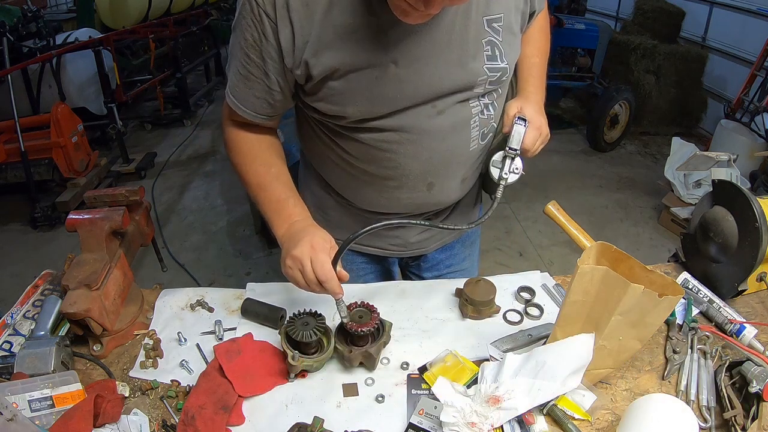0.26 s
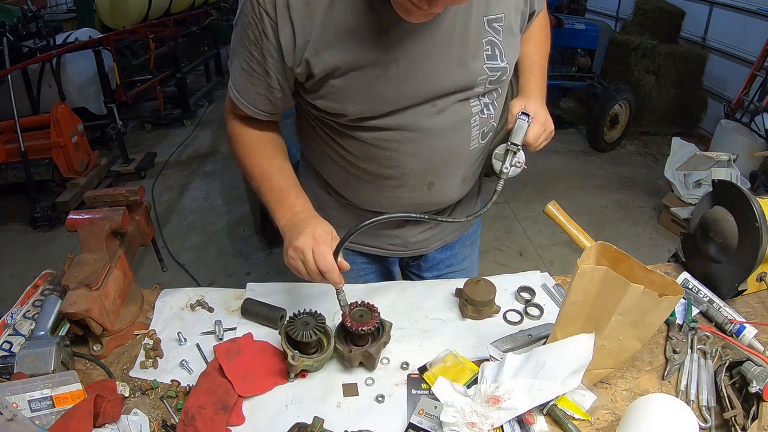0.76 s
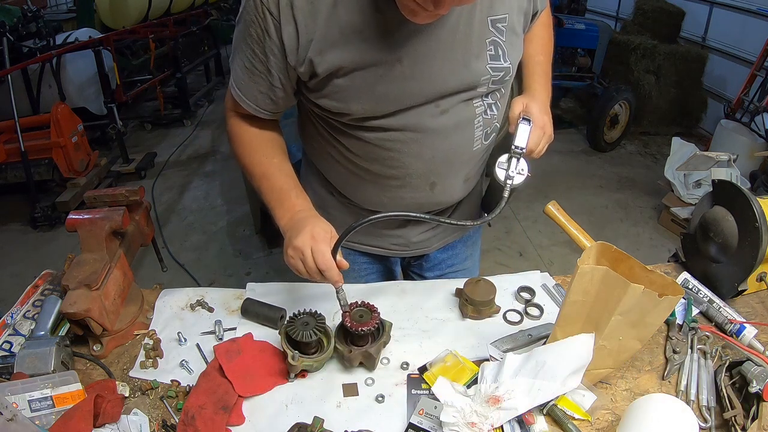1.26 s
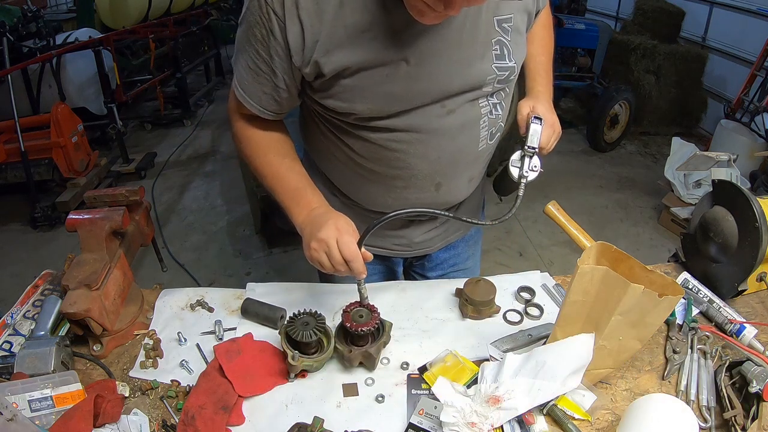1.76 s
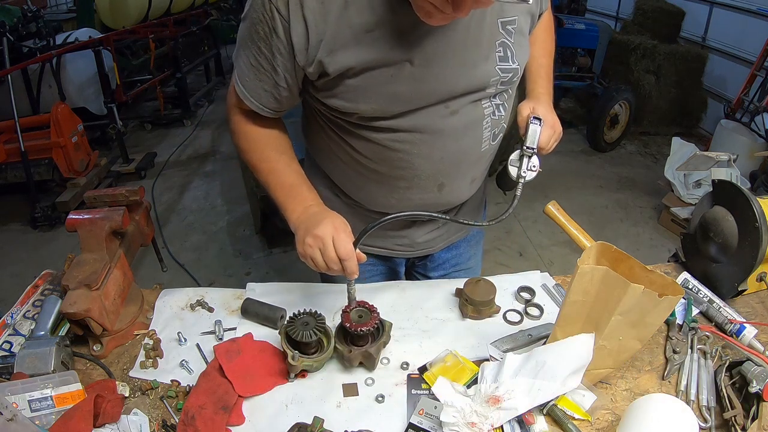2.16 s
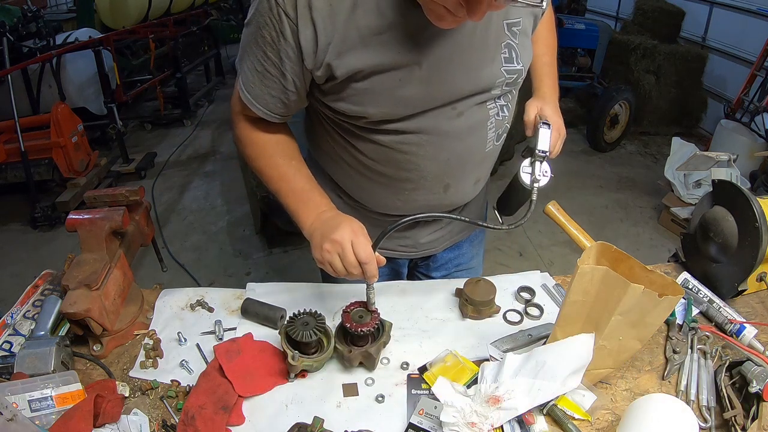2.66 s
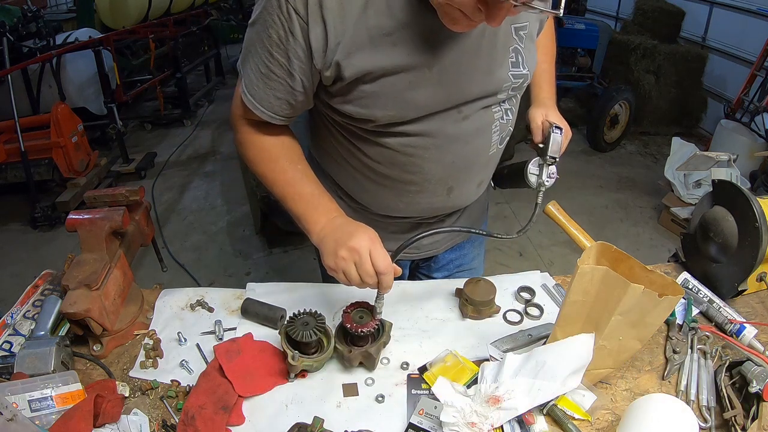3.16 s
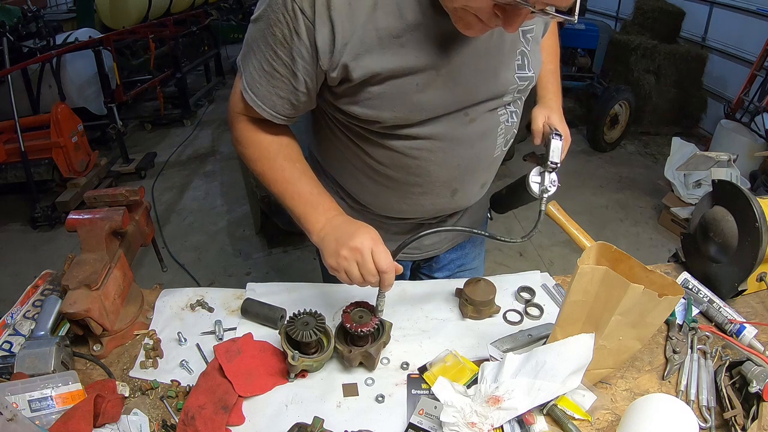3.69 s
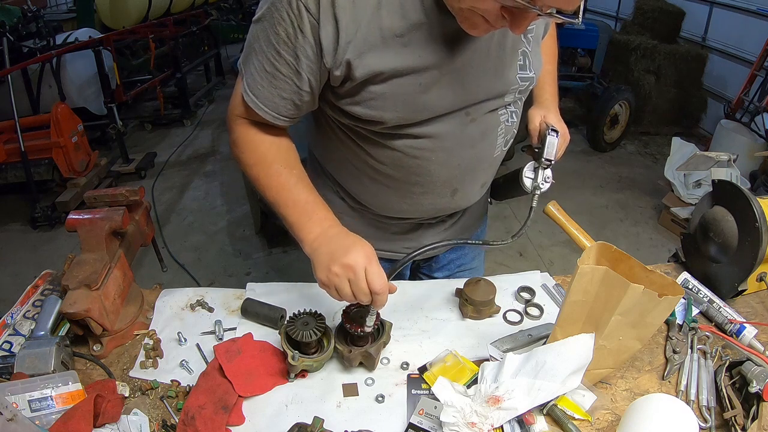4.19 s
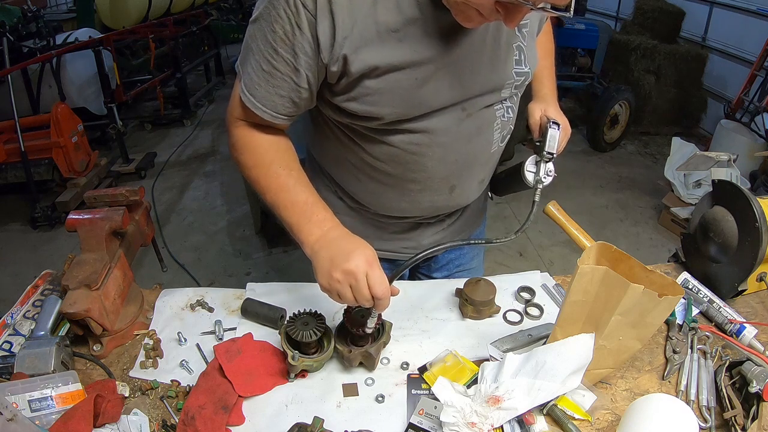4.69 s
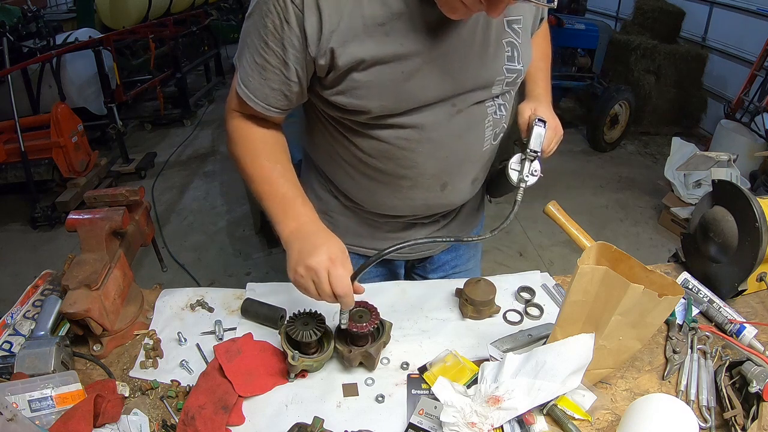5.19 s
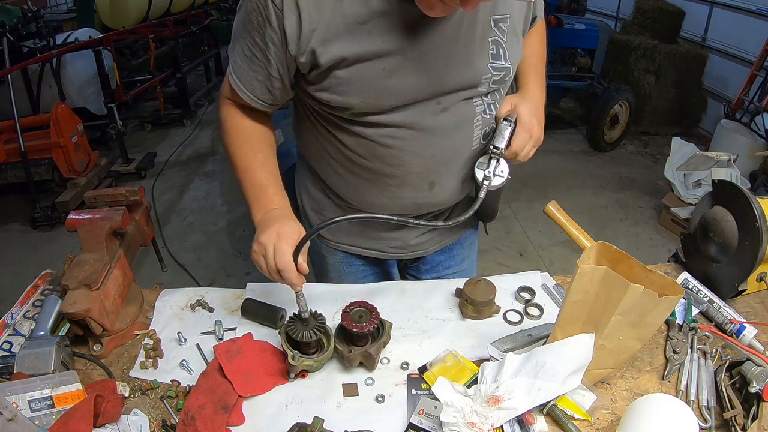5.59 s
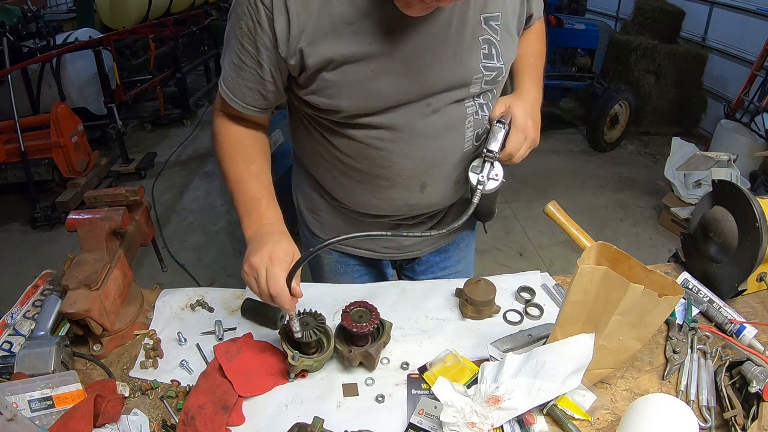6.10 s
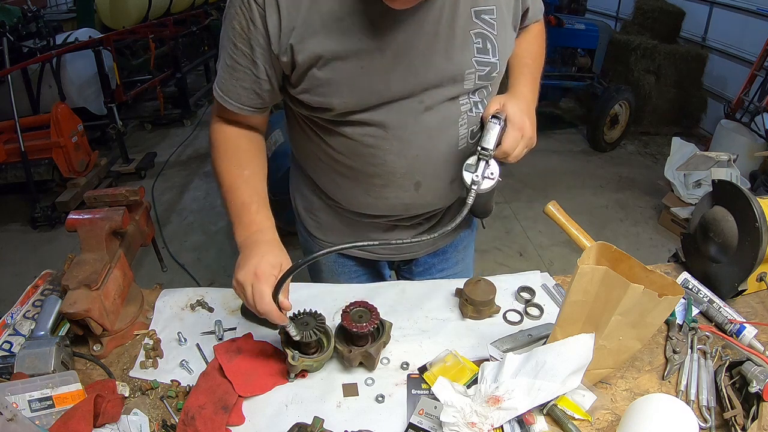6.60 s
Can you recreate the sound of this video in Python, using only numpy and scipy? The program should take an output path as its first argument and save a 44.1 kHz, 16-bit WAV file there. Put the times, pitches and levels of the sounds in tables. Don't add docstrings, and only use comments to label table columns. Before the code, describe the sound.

Scratchy, ringing, high-pitched rubbing and ticking from a pumped grease gun in a shed, over soft room noise and a growing deep vehicle rumble.

```python
import sys
import numpy as np
from scipy import signal
from scipy.fft import rfft, irfft, next_fast_len
from scipy.io import wavfile
from scipy.ndimage import uniform_filter1d, map_coordinates

SR = 44100
rng = np.random.default_rng(int(sys.argv[2]) if len(sys.argv) > 2 else 0)


def digitize_waveform(pressure):
    field = np.atleast_2d(pressure).T
    bounded = np.clip(field, -1, 1)
    quanta = np.round(bounded * 32767).astype(np.int16)
    wavfile.write(sys.argv[1], SR, quanta)


def volts_from_decibels(level):
    exponent = np.asarray(level, float) / 20
    return 10 ** exponent


N = 302085
TIME = np.arange(N) / SR


def unit(x):
    return x / np.sqrt(np.mean(np.abs(x) ** 2) + 1e-20)


def along(points, hz):
    f, v = np.transpose(points)
    return np.interp(np.log(hz + 1), np.log(f + 1), v)


def curves(tables):
    s, *cols = np.transpose(np.vstack(tables))
    sounding = sum((TIME >= rows[0][0]) & (TIME <= rows[-1][0]) for rows in tables) > 0
    return uniform_filter1d(1. * sounding, size=150), [np.interp(TIME, s, c) for c in cols]


def wobble(rate):
    return map_coordinates(rng.standard_normal(int(N * rate / SR) + 4), [TIME * rate])


def filtered(x, response):
    m = next_fast_len(N + SR // 2)
    return irfft(rfft(x, m) * response(np.fft.rfftfreq(m, 1 / SR)), m)[..., :N]


def noise(spectrum):
    return unit(filtered(rng.standard_normal(N), lambda hz: volts_from_decibels(along(spectrum, hz))))


def patchy(x, depth_db):
    z = signal.stft(x, nperseg=256)[2]
    field = uniform_filter1d(rng.standard_normal(z.shape[1:]), size=3, axis=0)
    field = unit(uniform_filter1d(field, size=16, axis=1))
    return unit(signal.istft(z * volts_from_decibels(depth_db * field), nperseg=256)[1][:, :N])


def ring(x, modes, shift_db):
    total = 0
    for hz, width_hz, db in modes:
        keep = np.exp(-np.pi * width_hz / SR)
        gain = np.sqrt(1 - keep ** 2)
        drive = volts_from_decibels(db + shift_db * np.tanh(wobble(16))) * x
        poles = [1, -2 * keep * np.cos(2 * np.pi * hz / SR), keep ** 2]
        total = total + signal.lfilter([gain, 0, -gain], poles, drive)
    return total


def glide(force, hz, width_hz, blow=0):
    keep = np.exp(-np.pi * width_hz / SR)
    grit = force * (rng.standard_normal(N) + 1j * rng.standard_normal(N))
    sway = signal.lfilter([1], [1, -keep], np.sqrt(1 - keep ** 2) * grit + blow)
    return np.real(sway * np.exp(2j * np.pi * np.cumsum(hz) / SR))


def kicks_at(s, db):
    kicks = np.zeros(N)
    kicks[np.round(s * SR).astype(int)] = volts_from_decibels(db)
    return kicks


def bursts(kicks, t60):
    return signal.lfilter([1], [1, -volts_from_decibels(-60 / (t60 * SR))], kicks, axis=-1)


def held(kicks):
    t, hold_s = np.arange(SR // 25) / SR, 0.004
    return signal.oaconvolve(kicks, volts_from_decibels(-60 * (t / 0.045 + (t / (hold_s * 5)) ** 2)))[:N]


# pitch_hz, level_db [dB per Hz]
ROOM_SHARED = [(150, -2.5), (250, -3.5), (350, -5), (500, -15), (750, -10), (1000, -15.5), (1500, -12.5),
               (2000, -11), (3000, -26.5), (15000, -90)]
# pitch_hz, level_db [dB per Hz]
ROOM_WIDE = [(100, -16), (250, 0.5), (350, -15), (500, -12.5), (1000, -15.5), (1500, -18), (2600, -25.5),
             (4200, -39), (7500, -43), (11000, -45), (15000, -64)]
# pitch_hz, level_db [dB per Hz]
FAR_HISS = [(1500, -15), (2500, 0), (5500, -4), (7500, -23), (9000, -32), (13200, -30), (14300, -56)]
# time_s, level_db
HISS_LEVEL = [
    (0, -69),
    (4.2, -71),
    (6.1, -68),
    (6.2, -75.5),
    (6.85, -72),
]


def room():
    nearing_db = 0.54 * (TIME - 4)
    hiss_db = curves([HISS_LEVEL])[1][0]
    mid = volts_from_decibels(-63.5 + nearing_db + 1.1 * wobble(3.3)) * noise(ROOM_SHARED) + volts_from_decibels(hiss_db) * noise(FAR_HISS)
    side = volts_from_decibels(-58 + 0.23 * nearing_db + 0.93 * wobble(2.4)) * noise(ROOM_WIDE)
    return np.array([mid + side, mid - side]) * volts_from_decibels([[-.8], [.8]])


def engine_order(level, hz):
    phase = 2 * np.pi * np.cumsum(hz) / SR + 0.51 * wobble(22)
    return level * volts_from_decibels(2.6 * wobble(16)) * np.sqrt(2) * np.sin(phase)


# peak_s, peak_db, length_s
DRONE_SWELLS = [(1.273, -75, 0.43), (1.718, -56, 0.22), (2.1, -61.5, 0.71), (2.45, -54, 0.44),
                (2.77, -53.5, 0.44), (3.13, -55, 0.33), (3.366, -45.5, .17), (3.531, -47, 0.2),
                (3.713, -41.5, 0.16), (3.93, -41.5, 0.26), (4.215, -39.5, 0.46), (4.504, -37, 0.64),
                (4.628, -35.5, 0.23), (5.006, -40.5, 0.45), (5.281, -31, 0.31), (5.134, -38, 0.29),
                (5.457, -33.5, 0.35), (5.75, -37, 0.094), (5.947, -32.5, 0.22), (6.101, -34.5, 0.28),
                (6.371, -35, 0.13), (6.658, -35.5, 0.27), (6.84, -46, 0.21)]


def drone():
    humps = []
    for s, db, length in DRONE_SWELLS:
        away = 2 * (TIME - s) / length * (1 + 0.16 * np.sign(TIME - s))
        humps.append(db - 29 * away ** 2)
    return engine_order(volts_from_decibels(np.max(humps, axis=0)), np.full(N, 73.3))


# time_s, pitch_hz, level_db
GROWLS = [
    [(5.55, 110, -58), (6.114, 108.8, -38), (6.22, 107.5, -60)],
    [(6.28, 120.2, -46.5), (6.436, 121.5, -43.5), (6.8, 114.7, -42)],
]


def growl():
    on, (hz, db) = curves(GROWLS)
    return engine_order(on * volts_from_decibels(db), hz)


# time_s, rumble_db
NEARNESS = [
    (0.0, -60.5),
    (0.57, -61),
    (3.81, -50.5),
    (4.55, -42.5),
    (4.83, -48),
    (5.25, -36),
    (6.24, -44.5),
    (6.85, -35),
]
# pitch_hz, level_db [dB per Hz]
RUMBLE_COLOUR = [(20, -86), (35, 0), (55, 10), (75, 16.5), (110, 13), (140, -1.5), (170, -72)]
# pitch_hz, level_db [dB per Hz]
ROAR_COLOUR = [(110, -3), (140, 6), (190, 6.5), (230, 0.5), (280, -21), (350, -39)]


def engine():
    tone = drone() + growl()
    rumble_db, = curves([NEARNESS])[1]
    roar_db = -59 + 0.19 * (rumble_db - rumble_db.mean())
    rumble = volts_from_decibels(rumble_db - 2.0 + 4.4 * np.tanh(wobble(9.6)) + 0.65 * wobble(3.96))
    roar = volts_from_decibels(roar_db + 2.65 * wobble(13) + 0.33 * wobble(2.95)) * noise(ROAR_COLOUR)
    mid = tone + rumble * noise(RUMBLE_COLOUR) + roar
    side = volts_from_decibels(-15.0) * np.roll(tone, 90)
    side = side + volts_from_decibels(-8.0) * rumble * noise(RUMBLE_COLOUR) + volts_from_decibels(roar_db - 4.0) * noise(ROAR_COLOUR)
    return np.array([mid + side, mid - side])


# start_s, pitch_hz, level_db
BUMPS = [
    (.74, 260, -53.5),
    (0.63, 230, -58),
    (3.08, 230, -55.5),
    (5.1, 283, -56.5),
    (1.386, 83, -43),
    (2.06, 270, -57.5),
    (3.02, 77, -42.5),
]


def bench():
    out = np.zeros(N)
    for s, hz, db in BUMPS:
        u = np.maximum(TIME - s, 0) / 0.0097
        out += volts_from_decibels(db + 12.0) * u * np.exp(-u) * np.sin(2 * np.pi * hz * (TIME - s))
    return out


# pitch_hz, t60_s
WALL_DECAY = [(1000, 0.14), (3000, 0.33), (6000, 0.34), (9000, 0.35)]


def shed(x):
    hz, t, z = signal.stft(rng.standard_normal((2, SR // 2)), SR, nperseg=256)
    tail = signal.istft(z * volts_from_decibels(-60 * t / along(WALL_DECAY, hz)[:, None]), SR, nperseg=256)[1]
    return signal.fftconvolve(x[None], tail / np.linalg.norm(tail[0]), axes=1)[:, :N]


def bench_top(x):
    t60 = 0.018
    tail = rng.standard_normal((2, 1500)) * volts_from_decibels(-60 * np.arange(1500) / SR / t60)
    return signal.oaconvolve(x[None], tail / np.linalg.norm(tail[0]), axes=1)[:, :N]


# start_s, peak_db
NOZZLE_TAPS = [
    (2.04, -33),
    (4.5006, -45),
    (4.659, -40.5),
    (6.3491, -41),
]


def taps():
    s, db = np.transpose(NOZZLE_TAPS)
    return glide(bursts(kicks_at(s, db - 7.0), t60=0.024), np.full(N, 2200.), width_hz=740)


# start_s, length_s, from_hz, to_hz, level_db
SEAL_SQUEAKS = [
    (3.356, 0.013, 7750, 7590, -35.5),
    (6.14, 0.052, 5450, 5250, -63),
    (6.173, 0.025, 5860, 5580, -58.5),
    (6.2, 0.029, 5100, 4532, -75),
]


def squeaks():
    out = np.zeros(N)
    for s, length, from_hz, to_hz, db in SEAL_SQUEAKS:
        u = np.clip((TIME - s) / length, 0, 1)
        phase = 2 * np.pi * np.cumsum(from_hz + (to_hz - from_hz) * u) / SR
        out += volts_from_decibels(db) * np.sin(np.pi * u) * np.sin(phase)
    return out


# start_s, length_s, from_hz, to_hz, level_db
SEAL_SQUEALS = [(.925, .11, 4800, 5120, -52), (.95, .07, 2080, 1900, -58), (.93, .08, 2640, 2600, -54),
                (2.47, .065, 4270, 4270, -60), (2.565, .125, 4270, 4260, -52),
                (2.575, .032, 1930, 1950, -57), (2.62, .07, 2580, 2550, -57), (3.6, .07, 5400, 5250, -47),
                (2.54, .05, 7500, 7550, -52), (4.3, .045, 5520, 5320, -51), (3.29, .05, 5950, 5600, -45),
                (3.4, .11, 4450, 4350, -51), (3.37, .07, 7150, 7000, -52), (3.37, .07, 5600, 5250, -47),
                (3.34, .05, 3450, 3200, -57), (3.42, .08, 3170, 3150, -59), (5.375, .056, 5000, 5350, -46),
                (5.49, .16, 4100, 4240, -57), (5.36, .07, 4300, 4250, -56), (6.56, .17, 5420, 5480, -46)]


def squeals():
    out, keep = np.zeros(N + SR), np.exp(-np.pi * 45 / SR)
    span = SR // 4
    for s, length, from_hz, to_hz, db in SEAL_SQUEALS:
        a, b = rng.standard_normal((2, span))
        u = np.clip(np.arange(span) / SR / length, 0, 1)
        sway = signal.lfilter([np.sqrt(1 - keep ** 2)], [1, -keep], a + 1j * b)
        sway = sway * np.sqrt(np.abs(np.sin(np.pi * u)))
        turn = np.exp(2j * np.pi * np.cumsum(from_hz + (to_hz - from_hz) * u) / SR)
        out[round(s * SR):][:span] += volts_from_decibels(db) * np.real(sway * turn)
    return out[:N]


# time_s, level_db, whistle_hz
CREEPING = [
    (5.66, -61, 5378),
    (5.664, -64, 5720),
    (6.22, -73.5, 5663),
]


def creep():
    on, (db, hz) = curves([CREEPING])
    return glide(on * volts_from_decibels(db), hz, width_hz=160)


# start_s, length_s, gap_s, peak_db, whistle_hz
SLIP_RUNS = [
    (6.281, .01, .02, -58, 5500),
    (6.335, .07, .059, -51.5, 5400),
]


def stutters():
    runs, k = [], np.arange(16)
    for s, length, gap, db, hz in SLIP_RUNS:
        late, louder, higher = rng.standard_normal((3, 16))
        starts = s + gap * (k + 0.0089 * (k > 0) * late)
        run = np.transpose([starts, db + 3 * louder, hz + 149 * higher])
        runs.append(run[k * gap < length])
    return np.vstack(runs)


# start_s, peak_db, whistle_hz
LONE_SLIPS = [(1.078, -39, 5593), (1.272, -31.5, 5615), (1.305, -28.5, 5640), (1.336, -32, 5640),
              (1.435, -31, 5458), (1.942, -25.5, 5620), (1.964, -37, 5610), (1.985, -27.5, 5460),
              (2.025, -34, 5640), (2.052, -28.5, 5530), (2.065, -37, 5930), (2.086, -35.5, 5638),
              (2.118, -29.5, 5480), (2.168, -33.5, 6310), (2.18, -28.5, 5530), (2.234, -34, 6210),
              (4.233, -39.5, 5800), (4.421, -38.5, 5644), (4.892, -30, 5600), (4.907, -35.5, 5600),
              (4.952, -34.5, 6070), (4.978, -30.5, 5600), (5.003, -38, 5660), (5.084, -36.5, 5610),
              (5.097, -28.5, 5680), (5.276, -50, 5460), (6.443, -53, 5410)]
# start_s, peak_db, whistle_hz
FALTERING = [(0.5091, -28.5, 5700), (0.5247, -29.5, 5770), (0.537, -32, 6290), (0.5548, -43, 5780),
             (0.5681, -28.5, 5840), (0.5853, -36, 5870), (0.605, -42, 5520), (0.6231, -35, 6380),
             (0.6302, -39, 5680), (0.6626, -29.5, 5680), (0.6742, -40, 5470), (0.6846, -31.5, 6280),
             (0.7055, -34.5, 6360), (0.7182, -41, 6350), (0.7355, -38, 5700), (0.7491, -42, 6330),
             (2.255, -29.5, 5670), (2.2655, -33, 5580), (2.2787, -50, 6290), (2.2927, -27, 5680),
             (2.329, -29, 5710), (2.3467, -35, 5700), (2.3609, -31.5, 5710), (3.9643, -29, 5930),
             (3.9778, -30, 6030), (4.0006, -30.5, 5780), (4.0138, -31, 5870), (4.0252, -33.5, 5880),
             (4.0346, -37, 5510), (4.0445, -39, 5920), (4.0872, -31, 5880), (4.0982, -30.5, 5880),
             (4.1146, -32, 5880), (4.1255, -31, 5420), (4.1479, -33.5, 5860),
             (4.3077, -32.5, 5840), (4.322, -33, 5870), (4.5202, -36.5, 5700), (4.5366, -39.5, 6050),
                   (4.603, -27.5, 5570), (4.6219, -29.5, 5660), (4.6304, -31, 5640), (4.733, -32, 5660),
                   (4.7423, -28.5, 5660), (4.76, -32, 5700), (4.7747, -43, 5670), (4.7829, -32.5, 5660),
                   (4.7938, -30.5, 5700), (4.8134, -30, 6050), (4.8339, -34.5, 5740), (4.8446, -44, 6270),
                   (6.4969, -44.5, 5480), (6.5115, -48, 5600), (6.5203, -34, 5480), (6.5338, -36, 5470),
                   (6.544, -36, 5490), (6.5537, -36, 5490)]


def slips():
    faltering = np.array(FALTERING) + [0, -3, 0]
    rows = np.vstack([LONE_SLIPS, stutters(), faltering])
    s, db, hz = rows[np.argsort(rows[:, 0])].T
    kicks = kicks_at(s, db - 7)
    force = 0.62 * held(kicks) + 0.1 * bursts(kicks, t60=0.16)
    latest = np.maximum(np.searchsorted(s, TIME + 1 / SR) - 1, 0)
    return kicks, force, hz[latest]


def slip_whistle(blow, slip, slip_hz):
    ping_s = 0.0034
    ping = signal.oaconvolve(blow, np.clip(1 - (TIME[:400] / ping_s) ** 2, 0, 1))[:N]
    return glide(0.88 * slip, slip_hz, width_hz=384, blow=volts_from_decibels(-26) * ping)


def stroke(tables, rate, scatter_db, t60, steady):
    on, (db, *colour) = curves(tables)
    turns = np.cumsum(rate * volts_from_decibels(0.37 * (db + 41.5) + 2.7 * wobble(70))) / SR
    kicks = np.diff(np.floor(turns), prepend=0) * volts_from_decibels(scatter_db * rng.standard_normal(N))
    rough = bursts(kicks, t60)
    force = steady + unit(rough / (1e-9 + uniform_filter1d(rough, size=4000)))
    return on * volts_from_decibels(db) * unit(force), *colour


# start_s, peak_db
CATCHES_EARLY = [
    [(0.0206, -41), (0.0346, -34.5), (0.05, -33), (0.0753, -24.5), (0.1506, -28.5), (0.1666, -39),
     (0.1832, -47), (0.1903, -40), (0.2272, -28), (0.245, -22), (0.2812, -30), (0.2918, -34), (0.2994, -28),
     (0.3208, -36), (0.3315, -35), (0.3407, -26), (0.3495, -43), (0.3601, -33), (0.3761, -24),
     (0.3862, -27), (0.3987, -26), (0.4211, -22), (0.4379, -31), (0.4535, -22), (0.4642, -31),
     (0.4734, -24), (0.4938, -34)],
    [(1.3496, -25), (1.3674, -31), (1.3747, -33), (1.3839, -31), (1.4181, -23), (1.4756, -43),
     (1.4852, -34), (1.4922, -28), (1.5082, -25), (1.5213, -35), (1.5362, -28), (1.5481, -27),
     (1.5747, -27), (1.5836, -28), (1.6026, -25), (1.6238, -34), (1.6341, -23), (1.6503, -33),
     (1.6621, -33), (1.694, -42), (1.7054, -25), (1.7165, -34), (1.7401, -27), (1.7689, -24), (1.7785, -34),
     (1.8156, -27), (1.8227, -31), (1.8309, -31), (1.8439, -24), (1.8543, -30), (1.8636, -25),
     (1.8827, -29), (1.8989, -25.5), (1.9236, -41)],
]
# start_s, peak_db
CATCHES_LATER = [(2.8075, -41), (2.8162, -37), (2.8313, -29), (2.859, -21), (2.8802, -24), (2.918, -25),
                 (2.932, -27), (2.9424, -25.5), (2.9579, -34), (2.966, -31), (2.9832, -22), (2.997, -29),
                 (3.0056, -28), (3.0191, -24), (3.0268, -28.5), (3.0355, -34), (3.048, -24),
                 (3.0644, -30.5), (3.0754, -20), (3.0883, -25), (3.118, -29), (3.132, -29), (3.143, -29),
                 (3.1574, -41), (3.5836, -30), (3.593, -27), (3.6015, -23), (3.608, -29), (6.5638, -34),
                 (6.5777, -29), (6.5907, -25.5), (6.5995, -26), (6.6108, -30), (6.624, -37), (6.634, -32),
                 (6.645, -26), (6.6565, -28), (6.676, -32), (6.7016, -30), (6.7425, -30), (6.7898, -36),
                 (6.802, -27), (6.8267, -28), (6.833, -29), (6.8407, -30)]


def catches():
    s, db = np.vstack([*CATCHES_EARLY, CATCHES_LATER]).T
    return bursts(kicks_at(s, db - 15), t60=0.022)


# time_s, rub_db, whistle_hz
SQUEEZES = [
    [(0.0, -47.5, 5600), (0.158, -38.5, 5646), (0.42, -40.5, 5760), (0.5, -47.5, 5711), (0.6, -46, 5800),
     (0.65, -52.5, 5780), (0.755, -57.5, 5780)],
    [(1.2, -67.5, 5670), (1.262, -55.5, 5590), (1.27, -50, 5696)],
    [(1.35, -45, 5560), (1.412, -41, 5550), (1.43, -56, 5570)],
    [(1.475, -44, 5550), (1.541, -44.5, 5484), (1.555, -50, 5505)],
    [(1.572, -48, 5470), (1.574, -44.5, 5480), (1.75, -41, 5600), (1.935, -50, 5703)],
    [(2.255, -48.5, 5680), (2.31, -46.5, 5700), (2.37, -50, 5710)],
    [(2.81, -46.5, 5430), (2.83, -39, 5430), (2.975, -41, 5560)],
    [(2.985, -42, 5580), (3.136, -38, 5825), (3.175, -52, 5920)],
    [(3.585, -58, 5480), (3.606, -53.5, 5480), (3.615, -43.5, 5448), (3.937, -44, 5725),
     (3.945, -45.5, 5725), (3.955, -54, 5554)],
    [(6.515, -53.5, 5675), (6.569, -44.5, 5450), (6.7, -40.5, 5480), (6.78, -42, 5550), (6.85, -44.5, 5600)],
]


def squeeze_stroke():
    drag, hz = stroke(SQUEEZES, rate=89, scatter_db=-1.0, t60=0.028, steady=3.7)
    return volts_from_decibels(-3.5) * drag + catches(), hz


# time_s, rub_db, whistle_hz, sucked_air_hz
RETURNS = [
    [(0.865, -65, 5355, 2130), (0.912, -54.5, 5400, 2000), (0.93, -45.5, 5600, 1960),
     (1.0, -42.5, 5460, 1896), (1.1, -47.5, 5580, 1955), (1.145, -56.5, 5670, 2090)],
    [(2.445, -70.5, 5700, 1994), (2.495, -58.5, 5740, 2068), (2.505, -51.5, 5720, 2060),
     (2.56, -40, 5584, 2000), (2.58, -41.5, 5500, 1900), (2.63, -44.5, 5335, 1596),
     (2.68, -47.5, 5490, 1560), (2.69, -49.5, 5530, 1552)],
    [(3.26, -62.5, 5725, 2117), (3.29, -48, 5710, 2053), (3.31, -39.5, 5690, 2000), (3.33, -44, 5587, 1850),
     (3.37, -44.5, 5450, 1600), (3.49, -48, 5080, 1493), (3.515, -56.5, 5050, 1536)],
    [(5.335, -58.5, 5420, 2017), (5.35, -54.5, 5447, 2050), (5.397, -44, 5425, 2090),
     (5.46, -47, 5530, 2150), (5.62, -50.5, 5540, 2252), (5.66, -55, 5470, 2285)],
]


def return_stroke():
    back, back_hz, suck_hz = stroke(RETURNS, rate=170, scatter_db=2.0, t60=0.036, steady=0.86)
    returning, (rub_db, *_) = curves(RETURNS)
    travel = curves([[(rows[0][0], 0), (rows[-1][0], 1)] for rows in RETURNS])[1][0]
    light_db = returning * 0.76 * (-43.5 - rub_db)
    late_db = returning * 7 * travel
    return back, back_hz, suck_hz, returning, light_db, late_db


# pitch_ratio, level_db
WHISTLE_TWINS = [(.96, -5), (1.035, -4.5), (1.118, -10.5)]
# pitch_ratio, level_db
SIDE_NOTES = [(.49, -13), (.82, -13.5), (1.3, -12.5)]


def whistle(squeeze, back, stroke_hz, slack_db):
    push = volts_from_decibels(-0.25 - 0.44 * slack_db) * squeeze + volts_from_decibels(-3.5) * back
    total = 0
    for ratio, db in [(1, 0), *WHISTLE_TWINS]:
        trading = volts_from_decibels(db + 4 * np.tanh(wobble(10)))
        total = total + glide(trading * push, ratio * stroke_hz, width_hz=144)
    for ratio, db in SIDE_NOTES:
        force = volts_from_decibels(db) * back + volts_from_decibels(db - 8.5) * squeeze
        total = total + glide(force, ratio * stroke_hz, width_hz=170)
    return total


def barrel(squeeze, back, slip, blow, barrel_db, barrel_hz):
    main = glide(squeeze + back + 1.74 * slip, barrel_hz, width_hz=56, blow=0.69 * blow)
    flex_db = -30 + 0.82 * wobble(2.4) + 0.0722 * (barrel_hz - barrel_hz.mean())
    flex = glide(squeeze + slip, 0.41 * barrel_hz, width_hz=25)
    return volts_from_decibels(barrel_db + 2.5 * np.tanh(wobble(7.9))) * main + volts_from_decibels(flex_db) * flex


# pitch_hz, width_hz, level_db
BODY_MODES = [(2688, 66, -5), (2930, 240, -3.5), (4380, 580, -1)]
# pitch_hz, width_hz, level_db
SCRAPE_MODES = [(1228, 55, 4), (1536, 36, -2), (1640, 22, -22), (2000, 27, 4.5)]
# pitch_hz, width_hz, level_db
CAP_MODES = [(4250, 130, 0), (4780, 310, 1)]


def body(grit, back, suck_hz, returning, slack_db, light_db, late_db):
    scrape = volts_from_decibels(-37 + 0.55 * slack_db - 14 * returning) * grit
    cap = volts_from_decibels(-21 + 0.37 * slack_db + light_db + late_db) * back * rng.standard_normal(N)
    total = ring(volts_from_decibels(-18.5 + slack_db + light_db) * grit, BODY_MODES, shift_db=4.5)
    total += ring(scrape, SCRAPE_MODES, shift_db=7)
    total += ring(cap, CAP_MODES, shift_db=5.0)
    sucked_air = glide(volts_from_decibels(-13 + 0.4 * light_db - 1.5 * late_db) * back, suck_hz, width_hz=47)
    return total + sucked_air


# pitch_hz, width_hz, level_db
ROD_MODES = [(5100, 63, -26), (5480, 220, -4), (5720, 340, -0.5), (6307, 250, -2), (7040, 150, -14.5)]
# pitch_hz, width_hz, level_db
BRIGHT_MODES = [(4790, 220, -6.5), (7220, 82, -12.5), (7330, 100, -10.5), (7600, 480, -18.5)]


def steel(grit, bright_db):
    rod = ring(volts_from_decibels(-11.0) * grit, ROD_MODES, shift_db=4.5)
    return rod + ring(volts_from_decibels(bright_db - 16.0) * grit, BRIGHT_MODES, shift_db=4.0)


# pitch_hz, level_db [dB per Hz]
BRIGHT_HISS = [(7000, -39), (8200, 4.5), (8990, 4), (9400, 2), (9830, 0), (10800, -7.5), (12400, -3),
               (14400, -8), (14800, -40)]


def bright_hiss(force, bright_db):
    hiss = np.array([noise(BRIGHT_HISS), noise(BRIGHT_HISS)])
    return volts_from_decibels(0.34 * bright_db - 14.0) * force * patchy(hiss, depth_db=3.0)


# time_s, slack_db, barrel_free_db, barrel_ring_hz
HAND_GRIP = [(0.02, 5, 10.5, 3240), (0.3, -3, -4.5, 3250), (0.6, 5, -3.5, 3557), (0.76, 6, -8, 3450),
             (0.9, -5.5, 2.5, 3276), (1.43, 5, 4.5, 3256), (1.8, 1.5, -1, 3334), (2.1, 6.5, -4, 3423),
             (2.37, 0, -11.5, 3350), (2.6, -10.5, -0.5, 3334), (3.0, 3, -9, 3285), (3.3, -4, -3.5, 3406),
             (3.5, -7.5, 0, 3100), (3.7, 9.5, -3, 3334), (4.3, 12.5, -3.5, 3320), (4.7, 9.5, -2, 3426),
             (5.35, 0.5, 2, 3204), (6.7, 5.5, -3, 3280)]
# pitch_hz, level_db
TONE_FILTER = [(850, -9), (1250, -1), (1500, 0), (7800, 0), (8150, -14), (12000, -16)]


def gun():
    slack_db, free_db, barrel_hz = curves([HAND_GRIP])[1]
    squeeze, squeeze_hz = squeeze_stroke()
    back, back_hz, suck_hz, returning, light_db, late_db = return_stroke()
    blow, slip, slip_hz = slips()
    stroke_hz = np.where(returning > 0, back_hz, squeeze_hz)
    barrel_db = -10 + free_db + 0.5 * light_db
    bright_db = -6 + slack_db + 2.2 * (late_db - returning * 3.5)
    grit = (squeeze + 1.23 * back + 1.21 * slip) * rng.standard_normal(N)
    dry = whistle(squeeze, back, stroke_hz, slack_db) + slip_whistle(blow, slip, slip_hz) + creep()
    dry += barrel(squeeze, back, slip, blow, barrel_db, barrel_hz)
    dry += body(grit, back, suck_hz, returning, slack_db, light_db, late_db)
    dry += steel(grit, bright_db) + squeaks() + taps() + squeals()
    air = bright_hiss(squeeze + back + 0.75 * slip, bright_db)
    return filtered(dry, lambda hz: volts_from_decibels(along(TONE_FILTER, hz))), air


# pitch_hz, left_over_right_db
LEFT_LOUDER = [(1290, -3), (2380, -2.5), (4400, -2.5), (5800, 2), (8000, 1)]
# pitch_hz, lead_rad [radians]
LEFT_LEADS = [(1200, -1.2), (1900, -.2), (4400, -.2), (5170, -.75), (7000, -.7)]


def scene():
    dry, air = gun()

    def left(hz):
        return volts_from_decibels(along(LEFT_LOUDER, hz) / 2) * np.exp(.5j * along(LEFT_LEADS, hz))

    ports = filtered(dry, lambda hz: np.array([left(hz), 1 / left(hz)])) + air + 0.02 * air[::-1]
    echoes = volts_from_decibels(-9) * bench_top(dry) + volts_from_decibels(-10.5) * shed(dry + air[0])
    return volts_from_decibels(-1.0) * ports + echoes + engine() + room() + bench()


def top_cut(x):
    return signal.sosfilt(signal.butter(12, 15690, fs=SR, output="sos"), x)


def record(dry):
    mix = filtered(dry, lambda hz: hz < 15600)
    return top_cut(mix)


dry = scene()
out = record(dry)
digitize_waveform(out)
```